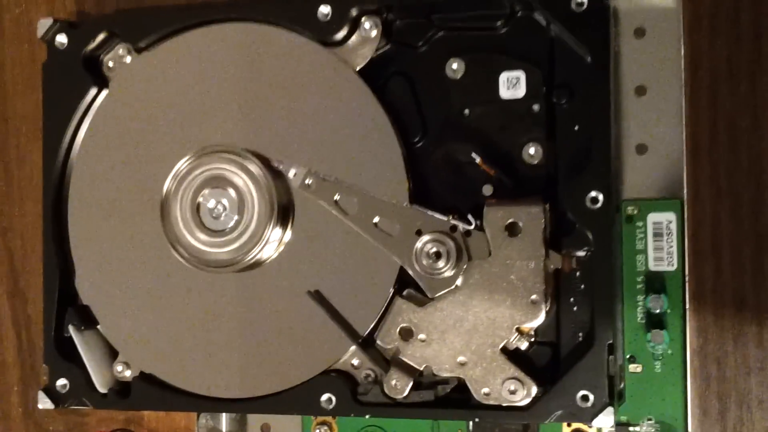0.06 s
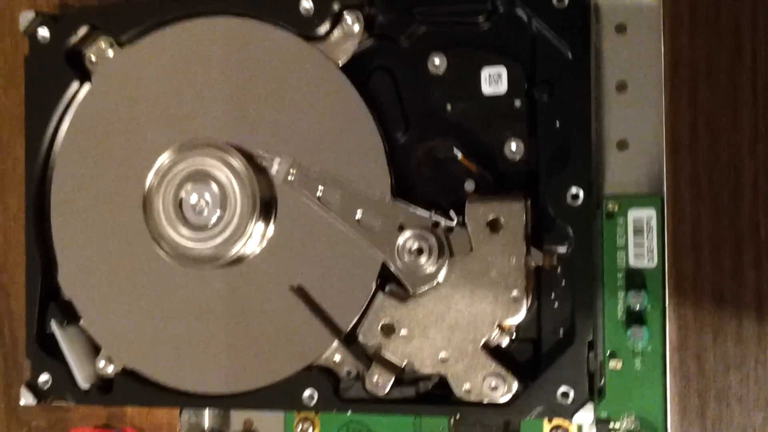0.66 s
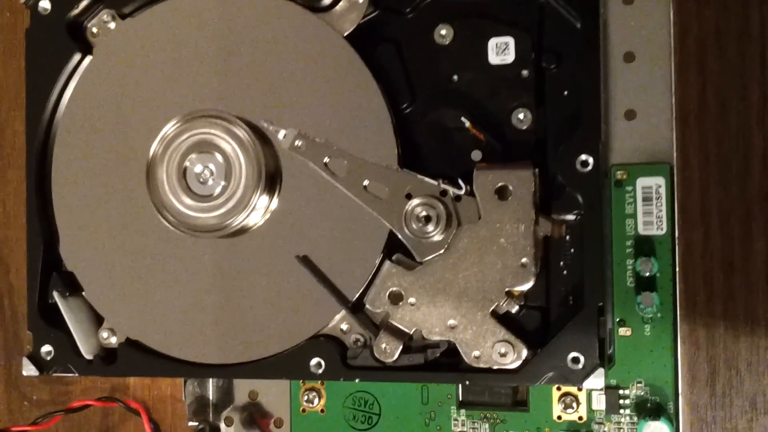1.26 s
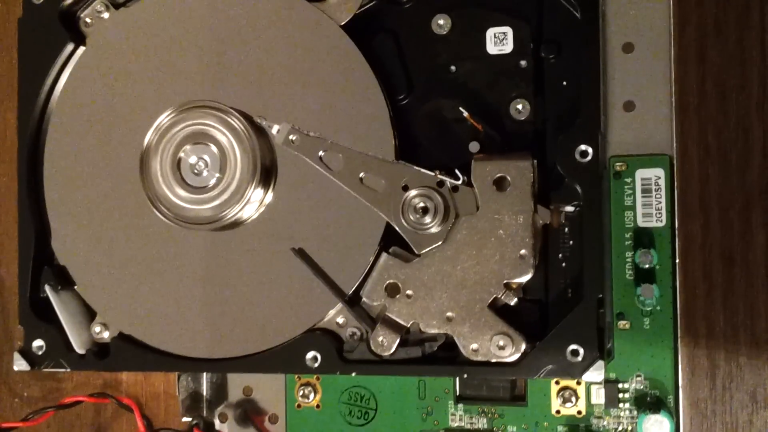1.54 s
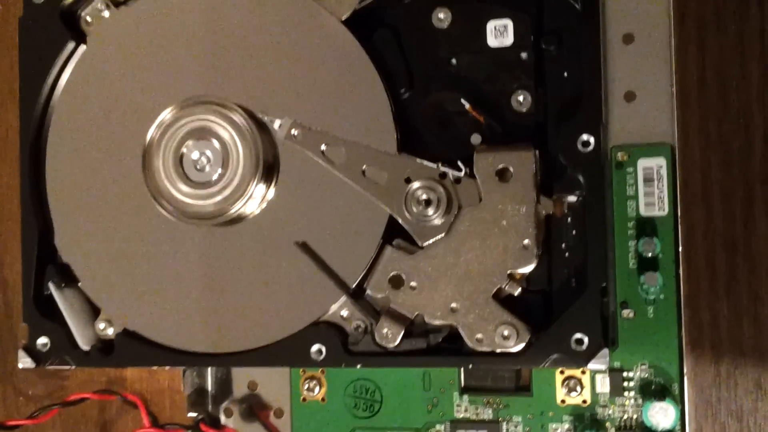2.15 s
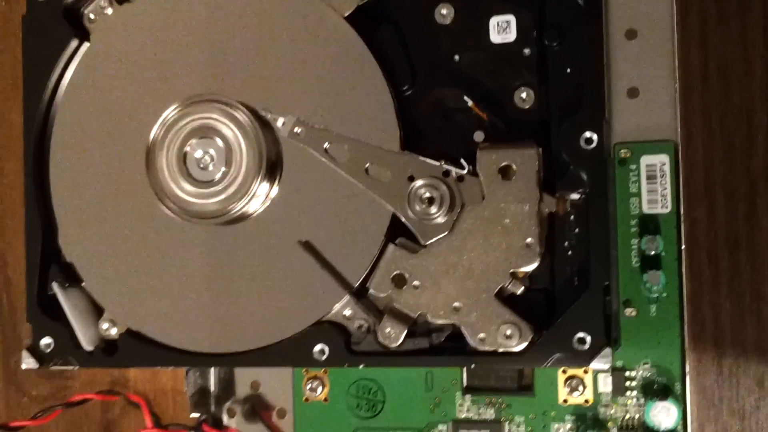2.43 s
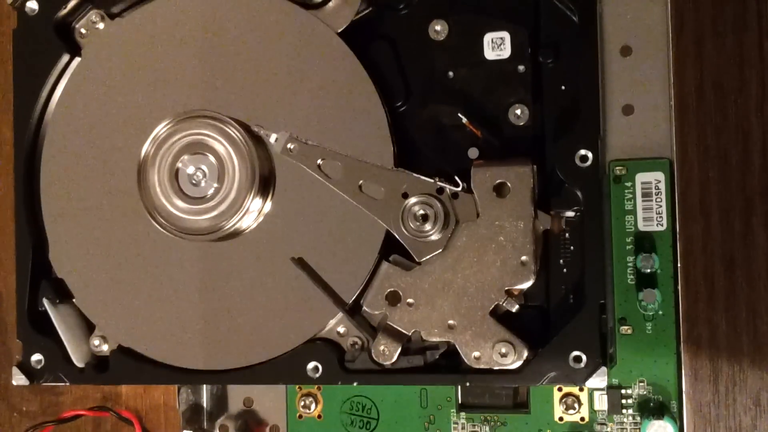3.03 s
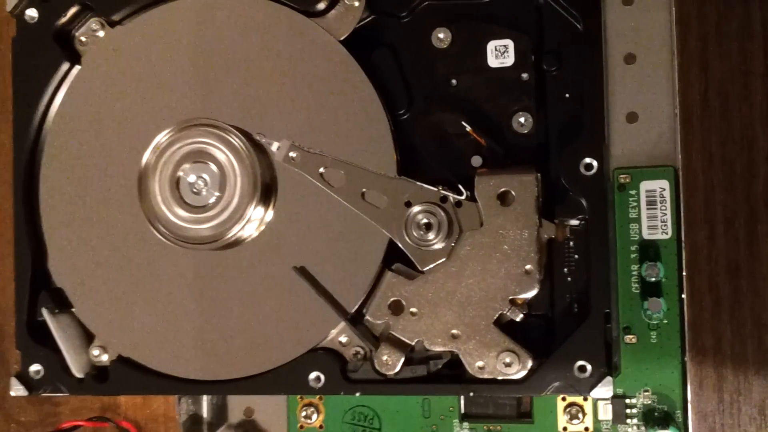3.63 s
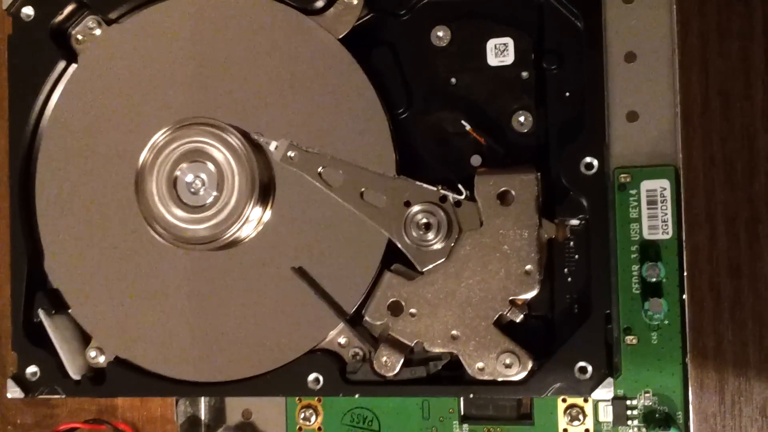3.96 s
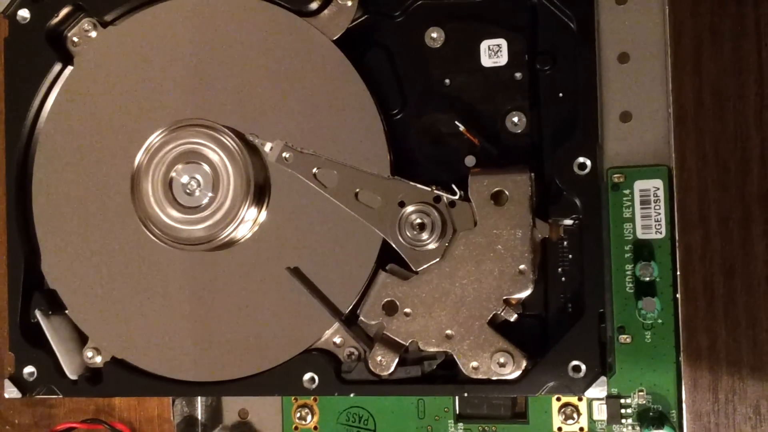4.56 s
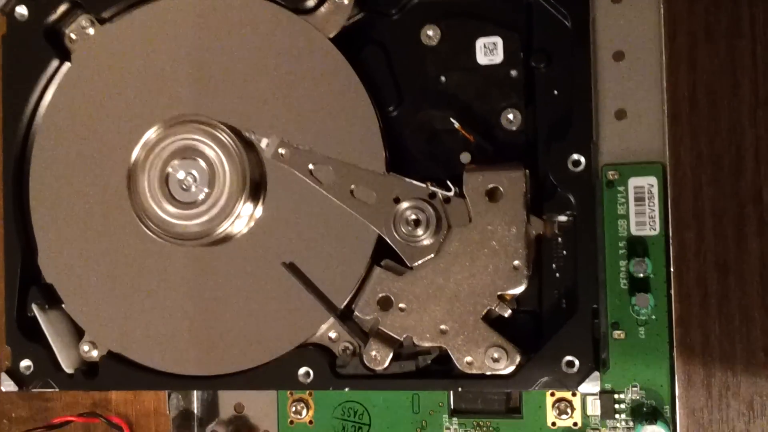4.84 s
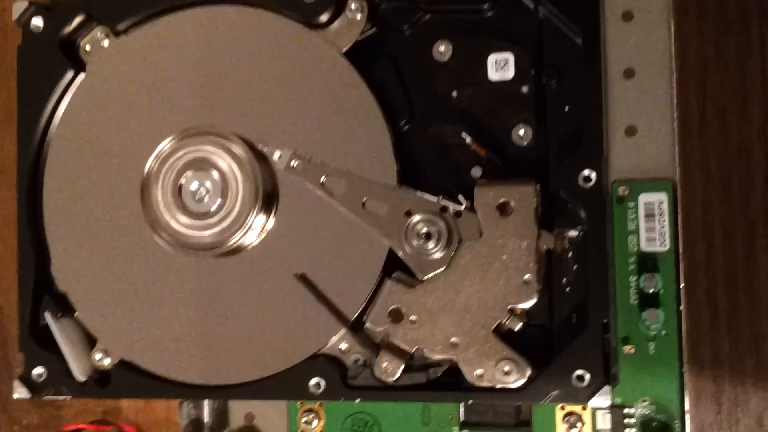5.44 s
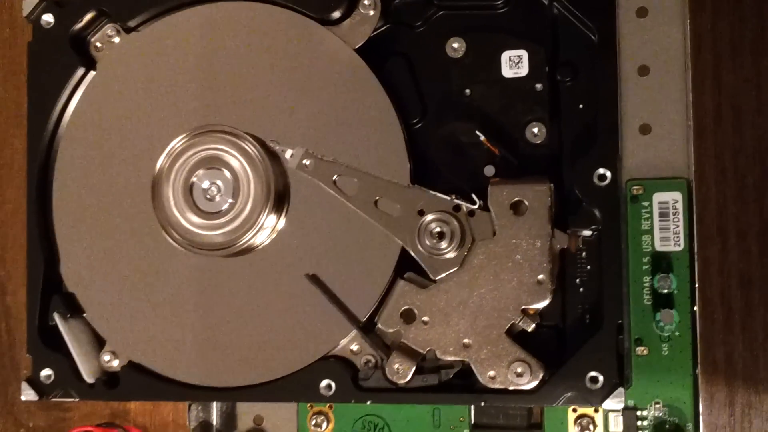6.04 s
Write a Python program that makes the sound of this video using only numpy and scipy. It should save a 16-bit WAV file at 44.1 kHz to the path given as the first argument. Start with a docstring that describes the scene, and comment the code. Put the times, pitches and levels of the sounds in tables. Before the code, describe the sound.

Sharp metallic clicks repeat in groups as an open hard drive's arm hits its stop, with the spinning platter whooshing steadily behind.

```python
"""The head arm of an opened hard drive slams into its stop, chatters, and ticks as it swings back. Attempts
come evenly paced, in runs of three, four and one; arm and casting ring in a small room. Behind it: air
whooshing round the spinning platter, a few soft bumps, one dry tick. Two close microphones; each slam is hard-
clipped and makes the gain control duck the whoosh."""
import sys
import numpy as np
from scipy import signal
from scipy.fft import rfft, irfft
from scipy.io import wavfile
from scipy.ndimage import uniform_filter1d

SR = 44100
rng = np.random.default_rng(int(sys.argv[2]) if len(sys.argv) > 2 else 0)


def store_pcm(level_fs):
    """Save levels as 16-bit WAV."""
    pcm = np.round(np.clip(level_fs, -1, 1) * 32767).astype(np.int16)
    wavfile.write(sys.argv[1], SR, np.atleast_2d(pcm).T)


N = 277389

# platter air spectrum at each microphone: f/Hz, relative level/dB
AIR_LEFT = [(300, -81), (450, -73.5), (800, -63.5), (1050, -65.5), (1400, -54), (1700, -50.5), (2050, -59),
            (3900, -57), (4650, -51.5), (5300, -60.5), (7000, -62), (9000, -54.5), (11500, -56),
            (13300, -62.5)]
AIR_RIGHT = [(300, -69), (450, -70), (800, -65), (1200, -57.5), (1700, -51), (2000, -56.5), (2800, -49),
             (4100, -49), (5000, -51.5), (6300, -62), (9000, -67), (11800, -69), (13000, -72), (14400, -88)]
# air-driven resonances and dips of platter and casting: f/Hz, width/Hz, left/dB, right/dB
AIR_MODES = [(850, 170, 2.5, -0.5), (1100, 53, -6, 0), (1703, 110, 5.5, 4), (2315, 210, 5.5, 1),
             (2810, 126, 2, 3.5), (4050, 220, 1, 2), (4490, 300, 0.5, -2.5), (11580, 500, 3.5, 1.5)]
# air coherence between microphones: f/Hz, coherence/0-1, left lead/rad
AIR_COHERENCE = [(400, 0.2, 2.66), (900, 0.42, 1.9), (1246, 0.89, 2.79), (1654, 0.88, 2.4),
                 (2110, 0.73, 1.34), (2530, 0.58, 0.62), (2980, 0.68, 2.4), (3460, 0.22, 1.67),
                 (4210, 0.66, 4.13), (5000, 0.72, 4.43), (5630, 0.82, 5.46), (6780, 0.22, 3.04),
                 (10400, 0, 5.6), (11600, .48, 4.7), (12800, 0, 5.3)]
# dull bumps: t/s, level/dB
BUMPS = [(2.903, -25.5), (3.138, -23.5), (3.86, -30.5), (3.965, -29.5), (5.33, -33)]
# bump and dry tick spectra: f/Hz, relative level/dB
BUMP_SPECTRUM = [(70, -46), (140, -4.5), (300, 5), (600, 1.5), (1400, -0.5), (3000, -9.5)]
TICK_SPECTRUM = [(1000, -19), (4500, -17), (6200, 0), (8000, -10), (9600, -5), (14000, -22)]
# arm and casting modes: f/Hz, t60/s, left/dB, right/dB
ARM_MODES = [(1713, 0.09, -14.5, -13), (2578, 0.058, -7.5, -21), (2673, 0.062, -13, -6),
             (2833, 0.036, -22, -17), (3210, 0.08, -25, -14.5), (3500, 0.028, -20, -11),
             (3740, 0.035, -29, -0.5), (4007, 0.076, -12.5, -4.5), (4260, 0.063, -33, -3.5),
             (4605, 0.03, -3, -4.5), (4750, 0.039, -9.5, -4.5), (4890, 0.046, -15, 3.5),
             (5110, 0.032, -6, -0.5), (5580, 0.048, -8.5, -11), (6272, 0.028, -20, -3.5),
             (8020, 0.072, -7, -21), (8640, 0.045, -2.5, -35), (8800, 0.024, -3, -21),
             (9470, 0.057, -4.5, -28), (9480, 0.059, -6, -26), (10040, 0.017, 4, -15),
             (10380, 0.049, -5, -26), (10950, 0.032, -10, -22), (10950, 0.047, -1.5, -13),
             (11610, 0.021, -9, -14), (13550, 0.029, -5, -17)]
# spectrum of the dense, fast-dying modes between them: f/Hz, left/dB, right/dB
CRACK_SPECTRUM = [(100, -22, -16), (900, -6, -21), (1500, -9, -10), (2610, 6.5, -5.5), (4700, -3, 1),
                  (5500, -1, 3.5), (7260, -10, -3.5), (9100, 3, -3), (10900, 7.5, -1), (12700, 0.5, -1.5),
                  (14700, -2, -9)]
# modes of the swing-back tick: f/Hz, t60/s, left/dB, right/dB
SWING_MODES = [(1650, 0.028, -16, -7), (2240, 0.048, -10, -6.5), (2850, 0.027, -3, -8),
               (3200, 0.029, -14, -13), (3640, 0.034, -21, -1.5), (4200, 0.016, -13, -9),
               (4600, 0.017, -5, -2)]
# runs of attempts: first slam t/s, slam count
RUNS = [(.5890, 3), (2.8828, 4), (5.788, 1)]

BAND_LIMIT_HZ = 14560


def gain_of(db):
    """dB to amplitude factor."""
    return 10 ** (np.asarray(db) / 20)


def unit_rms(x):
    """Scale to rms 1."""
    return x / np.sqrt(np.mean(x ** 2) + 1e-20)


def decay(t, t60_s):
    """Exponential envelope, -60 dB at t60_s."""
    return np.exp(-np.log(1000) * t / t60_s)


def lookup(table, hz, column=1):
    """Table column, interpolated over log frequency."""
    columns = np.transpose(table)
    return np.interp(np.log(hz + 1), np.log(columns[0] + 1), columns[column])


def add(mix, at_s, sound):
    """Mix in a stereo sound."""
    part = mix[:, round(at_s * SR):][:, :sound.shape[1]]
    part += sound[:, :part.shape[1]]


def noise(left_db, right_db):
    """Uncorrelated stereo noise, shaped per bin, rms 1."""
    shape = gain_of([left_db, right_db])
    white = rng.standard_normal((2, 2 * shape.shape[1] - 2))
    return unit_rms(irfft(shape * rfft(white)))


def platter_whoosh(level_db=-15.0, eddy_db=1.0, swell_db=0.5, low_cut_hz=321, frame=1024):
    """Turbulent air round the platter, coloured by the casting, partly coherent between microphones."""
    frames, hz = 4 * N // frame + 5, np.fft.rfftfreq(frame, 1 / SR)
    re1, im1, re2, im2, patches = rng.standard_normal((5, frames, len(hz))).transpose(0, 2, 1)
    left, independent = re1 + 1j * im1, re2 + 1j * im2
    coherence = lookup(AIR_COHERENCE, hz)[:, None]
    lead_rad = lookup(AIR_COHERENCE, hz, column=2)[:, None]
    right = (coherence * left + np.sqrt(1 - coherence ** 2) * independent) * np.exp(-1j * lead_rad)
    modes_db = sum(np.outer(db, 1 / (1 + (2 * (hz - mode_hz) / width_hz) ** 2))
                   for mode_hz, width_hz, *db in AIR_MODES)
    air_db = np.array([lookup(AIR_LEFT, hz), lookup(AIR_RIGHT, hz)])
    passband = (hz < BAND_LIMIT_HZ) / (1 + (low_cut_hz / (hz + 1)) ** 20)
    colour = gain_of(air_db + modes_db) * passband
    eddies = unit_rms(uniform_filter1d(uniform_filter1d(patches, size=10, axis=0), size=8, axis=1))
    swell = unit_rms(uniform_filter1d(rng.standard_normal(frames), size=20))
    spectra = np.array([left, right]) * colour[:, :, None] * gain_of(eddy_db * eddies + swell_db * swell)
    _, air = signal.istft(spectra, nperseg=frame, noverlap=frame - frame // 4)
    return gain_of(level_db) * unit_rms(air[:, :N])


def bumps(rise_s=0.0042, t60_s=0.43, size=16384):
    """Soft, dull knocks; no ring."""
    out, t = np.zeros((2, N)), np.arange(size) / SR
    colour_db = lookup(BUMP_SPECTRUM, np.fft.rfftfreq(size, 1 / SR))
    envelope = (1 - np.exp(-t / rise_s)) * decay(t, t60_s)
    for at_s, level_db in BUMPS:
        add(out, at_s, gain_of(level_db) * noise(colour_db, colour_db) * envelope)
    return out


def dry_tick(at_s=3.132, level_db=-6.5, t60_s=0.011, size=1024):
    """One tiny snap near the drive, just before the second bump."""
    out, t = np.zeros((2, N)), np.arange(size) / SR
    colour_db = lookup(TICK_SPECTRUM, np.fft.rfftfreq(size, 1 / SR))
    add(out, at_s, gain_of(level_db) * noise(colour_db, colour_db) * decay(t, t60_s))
    return out


def room(x, t60_s=0.25, wet_db=-19, predelay_s=0.005, low_cut_hz=500, size=12000):
    """Add a faint small-room tail without bass."""
    t = np.arange(size) / SR
    tail = rng.standard_normal((2, size)) * decay(t, t60_s) * (t > predelay_s)
    tail = signal.sosfilt(signal.butter(4, low_cut_hz, "highpass", fs=SR, output="sos"), tail)
    tail /= np.linalg.norm(tail[0])
    return x + gain_of(wet_db) * signal.fftconvolve(x, tail, axes=1)[:, :N]


def ring(modes, rise_s, spread_db=0.5, size=6000):
    """Struck modes; each blow shares out its energy a little differently."""
    hz, t60_s, *sides_db = np.transpose(modes)
    t = np.arange(size) / SR
    amplitude = gain_of(np.array(sides_db) + spread_db * rng.standard_normal(len(hz)))
    phasor = np.exp(2j * np.pi * rng.random(amplitude.shape))
    partials = np.exp(2j * np.pi * hz[:, None] * t) * decay(t, t60_s[:, None])
    attack = 1 - np.exp(-(t / rise_s) ** 2)
    return ((amplitude * phasor) @ partials).real * attack


def bounces(gap_s, gap_ratio, loss_db, impacts=3):
    """Impact and rebounds, each sooner and weaker: delay/s, level/dB."""
    k = np.arange(impacts)
    gaps_s = gap_s * gap_ratio ** k
    return zip(np.cumsum(gaps_s) - gaps_s, -loss_db * k)


def stop_impact(ring_db=-3.5, crack_db=-1, crack_t60_s=0.037, size=6000):
    """Metal on metal: dense crack plus the longer modes of arm and casting."""
    hz, t = np.fft.rfftfreq(size, 1 / SR), np.arange(size) / SR
    crack = noise(lookup(CRACK_SPECTRUM, hz), lookup(CRACK_SPECTRUM, hz, column=2))
    ringing = ring(ARM_MODES, rise_s=0.00022, size=size)
    return gain_of(crack_db) * crack * decay(t, crack_t60_s) + gain_of(ring_db) * ringing


def head_arm(slam_gain_db=0.8, swing_gain_db=-10.0, retry_s=0.6182, swing_delay_s=0.0772):
    """Per attempt: arm hits its stop, rebounds into it, swings back with a rattling tick."""
    out = np.zeros((2, N))
    slams_s = [start_s + k * retry_s for start_s, count in RUNS for k in range(count)]
    for at_s in slams_s:
        for delay_s, db in bounces(gap_s=0.0061, gap_ratio=0.58, loss_db=3.0):
            add(out, at_s + delay_s, gain_of(slam_gain_db + db) * stop_impact())
        for delay_s, db in bounces(gap_s=0.0031, gap_ratio=0.797, loss_db=3.5):
            swing_tick = ring(SWING_MODES, rise_s=0.00046)
            add(out, at_s + swing_delay_s + delay_s, gain_of(swing_gain_db + db) * swing_tick)
    return out


def scene():
    """Drive indoors; room tail on the arm only."""
    return platter_whoosh() + room(head_arm()) + bumps() + dry_tick()


def record(dry, threshold_db=-10, slope=0.19, recovery_db_per_s=8, ceiling=0.82):
    """Gain control ducks on each slam; then hard clip and band limit."""
    power = signal.lfilter(np.ones(400) / 400, 1, (dry ** 2).mean(0))  # 9 ms mean
    demand_db = slope * np.maximum(10 * np.log10(power + 1e-12) - threshold_db, 0)
    ramp_db = np.arange(N) * recovery_db_per_s / SR
    duck_db = np.maximum.accumulate(demand_db + ramp_db) - ramp_db  # peak hold, steady release
    clipped = np.clip(dry / gain_of(duck_db), -ceiling, ceiling)
    lowpass = signal.firwin(511, BAND_LIMIT_HZ, window=("kaiser", 9), fs=SR)
    return signal.oaconvolve(clipped, lowpass[None], "same")


dry = scene()
out = record(dry)
store_pcm(out)
```